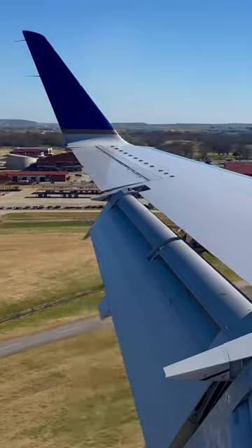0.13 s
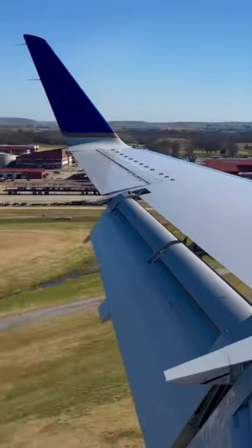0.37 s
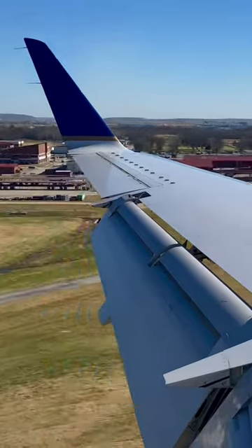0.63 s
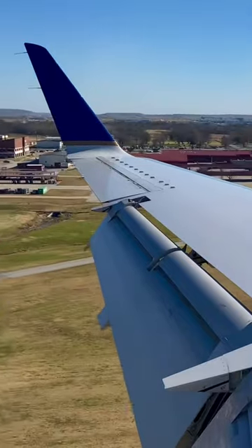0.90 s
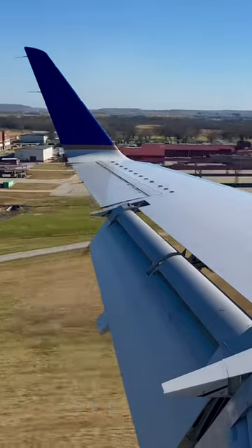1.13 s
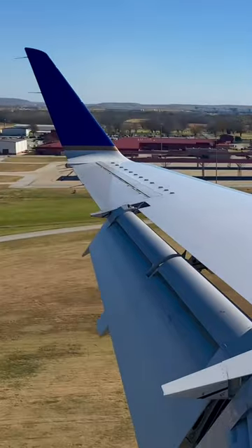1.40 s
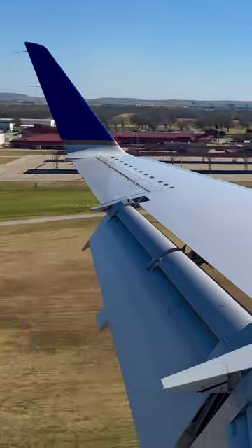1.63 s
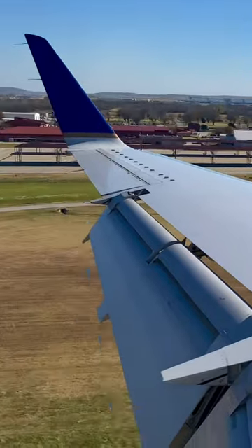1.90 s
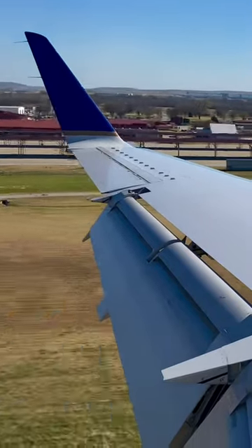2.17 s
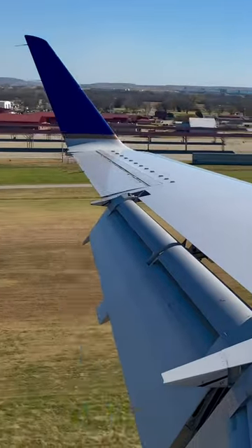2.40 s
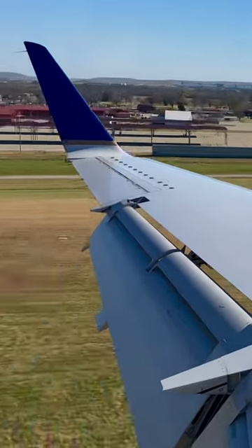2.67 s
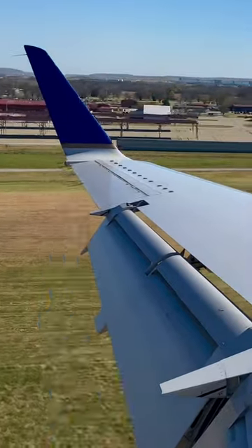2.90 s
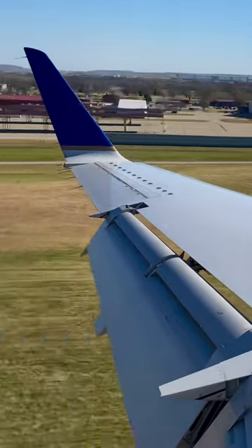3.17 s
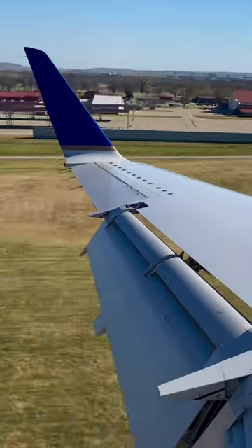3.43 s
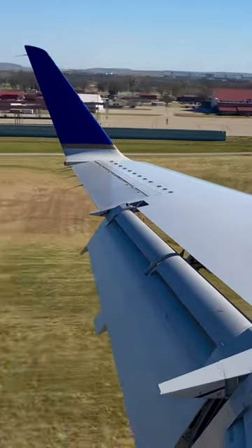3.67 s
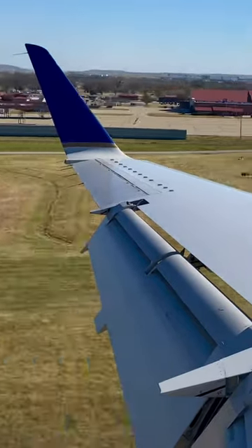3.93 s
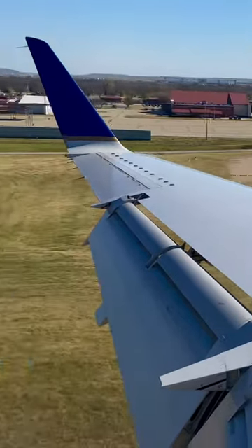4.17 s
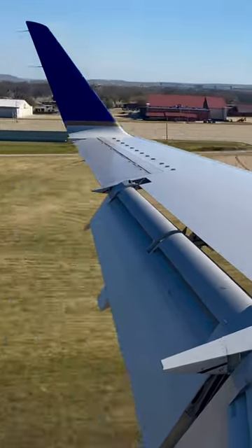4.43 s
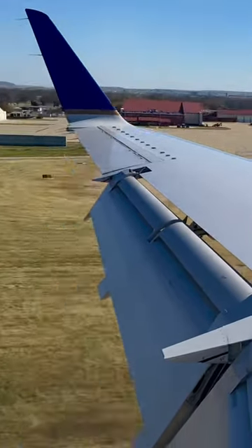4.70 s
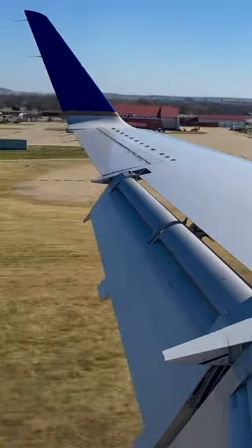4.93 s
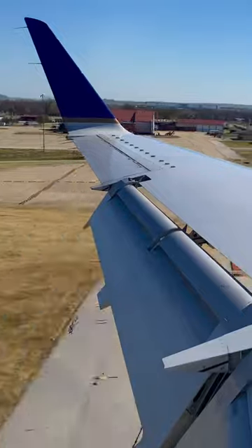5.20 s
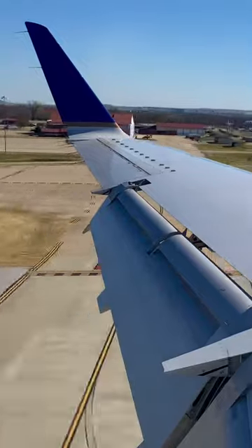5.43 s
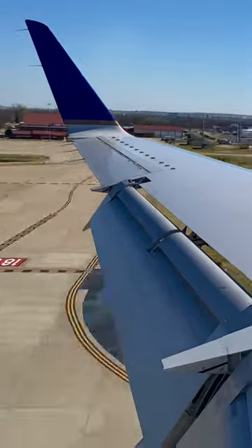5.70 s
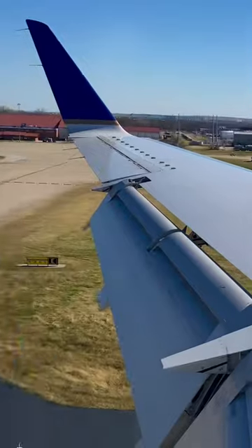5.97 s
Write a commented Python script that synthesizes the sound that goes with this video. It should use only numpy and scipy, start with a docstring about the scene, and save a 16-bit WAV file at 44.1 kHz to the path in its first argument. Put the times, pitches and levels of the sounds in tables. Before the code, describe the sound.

Inside a landing airliner, a dense low engine roar drones on, panels buffeted by air, faint unstable whistles flickering above it.

```python
"""A window seat over the wing of a twin-engine airliner on final approach, flaps down, heard by a two-port phone.
Jet rumble booms in the cabin's low modes and turbulent air drums on the wall panels: noise in resonances.
Gaps and ducts whistle like very narrow noise, wavering and breaking; a diffuse roar and vent hiss are shaped noise.
The two engine cores sing faint sine tones that sink as the throttles ease back.
Small rustles near the phone are short bursts of bright noise."""
import sys
import numpy as np
from scipy import signal
from scipy.fft import rfft, irfft, next_fast_len
from scipy.io import wavfile
from scipy.ndimage import uniform_filter1d, minimum_filter1d

SR = 44100
rng = np.random.default_rng(int(sys.argv[2]) if len(sys.argv) > 2 else 0)


def nominal_scale(level):
    """Amplitude ratio for a level in decibels (scalar or array-like)."""
    x = np.asarray(level, float) / 20
    return 10 ** x


def generate_wav(sig):
    """Save sig (samples, or channels by samples) to the path in sys.argv[1] as 16-bit PCM at SR."""
    pcm = np.round(np.clip(np.atleast_2d(sig).T, -1, 1) * 32767).astype(np.int16)
    wavfile.write(sys.argv[1], SR, pcm)


N = 268039
TIME = np.arange(N) / SR
SIZE = next_fast_len(N)
FREQ = np.arange(SIZE // 2 + 1) * SR / SIZE + 1e-3

# gear-mesh rate of the faster engine at the start and after the first throttle move
MESH_HZ, EASED_HZ = 767, 753.7
BLADE_ORDER = 7.852  # compressor blade tone as a multiple of the mesh rate
SIDE = np.array([[.5], [-.5]])  # splits a left-minus-right difference between the two ports


def hiss():
    """Spectrum of white noise with power 1 per Hz."""
    return rfft(rng.standard_normal(SIZE)) * np.sqrt(SR / 2)


def walk(rate):
    """Slow chance: noise smoothed twice over 1 / rate s, spread 1."""
    span = int(SR / rate)
    slow = uniform_filter1d(rng.standard_normal(N), span)
    slow = uniform_filter1d(slow, span)
    return slow / slow.std()


def ring(mode, steep):
    """Noise in one resonance, reaching the two ports with its own balance and phase."""
    hz, width, db, pan_db, lead = mode
    shape = (1 + ((FREQ - hz * hz / FREQ) / width) ** 2) ** (-steep / 2)
    shape = shape / np.sqrt(np.sum(shape ** 2) * SR / SIZE)  # rms 1 before the level is set
    ports = nominal_scale(db + SIDE * pan_db) * np.exp(1j * SIDE * lead)
    return irfft(hiss() * shape * ports, SIZE)[:, :N]


def drift(sound, share, rate):
    """Resonances wander: the sound is read slightly faster and slower by turns."""
    place = np.arange(N) + np.cumsum(share * walk(rate))
    return np.array([np.interp(place, np.arange(N), port) for port in sound])


def spool():
    """Mesh rate over time: after each throttle move the core sinks towards the new speed with a lag."""
    # throttle pulled back: (time [s], mesh rate aimed at [Hz])
    throttle_moves = [(1.95, EASED_HZ), (5.7, 745)]
    lag_s, speed_hunt = .55, .0003  # hunting is a share of the speed
    mesh_hz, before = np.full(N, float(MESH_HZ)), MESH_HZ
    for s, aim in throttle_moves:
        progress = 1 - np.exp(-np.maximum(TIME - s, 0) / lag_s)
        mesh_hz = mesh_hz + (aim - before) * progress
        before = aim
    return mesh_hz * (1 + speed_hunt * walk(2))


def boom():
    """Jet rumble in the long cabin's modes; each swells alone, all wander a little together."""
    # low cabin resonances:
    # (frequency [Hz], width [Hz], level [dB], left minus right [dB], left leads by [rad])
    cabin_modes = [(70.8, 37.3, -20, 1, 0.083), (86.8, 23, -21, 2, 0.044), (117, 16.6, -21, 2, 0.27),
                   (136.4, 27.6, -16, 2.5, 0.32), (158.2, 18, -23, 2.5, 0.35),
                   (199, 57.4, -23.5, 2.5, 0.071), (254, 78, -32, 0, 1.7), (318, 62, -35, 6, 1.37)]
    swell_db, swells_per_s = 0.65, 3.5
    buffet_db, buffets_per_s = 1.1, 18  # air buffeting the flaps shakes every mode at once
    rumble = sum(ring(mode, steep=1.86) * nominal_scale(swell_db * walk(swells_per_s)) for mode in cabin_modes)
    return nominal_scale(buffet_db * walk(buffets_per_s)) * drift(rumble, share=.02, rate=5)


def walls(high):
    """Turbulent air drums on the wall panels; each wavers alone, octaves gust and drift together."""
    # panel resonances:
    # (frequency [Hz], width [Hz], level [dB], left minus right [dB], left leads by [rad])
    panel_modes = [(423.5, 27, -33.5, 9.5, -2), (549.2, 24, -31, 5.5, 2.5), (595, 51, -29.5, 2.5, 3),
                   (628, 40, -29, 6.5, -3), (676.4, 59, -33, 0, 2), (814, 270, -41.5, 1, 3.0),
                   (753, 68, -38.5, 4.5, 3), (857, 24, -40.5, 0, 2.5), (840, 39, -43, -3, 3),
                   (975, 83, -39.5, -1, 2), (989, 59, -43.5, -3.5, 1.2), (1030, 130, -48, 2, 4.5),
                   (1179, 18, -48, 11.5, 2.5), (1391, 14, -51, 7.5, 4), (1536, 29, -55.5, 1, -3),
                   (1588, 21, -59.5, 6.5, 0), (2067, 83, -60, 0, 0), (2320, 100, -66.5, 5, 2),
                   (5070, 250, -67, 6.5, 1.5), (5760, 150, -70, 9, 2), (6140, 600, -65.5, 9.5, 1.8)]
    gust_db, gusts_per_s = 1.1, 5.8  # shared by neighbouring panels
    eddy_db, eddies_per_s = 1.6, 40  # quick eddies roughen the roar
    octaves = np.zeros((4, 2, N))  # from 400 Hz upwards
    for mode in panel_modes:
        # thrust drives the panels near 1 kHz most
        thrust_db = 2.7 * np.exp(-(np.log(mode[0] / 1000) / 0.34) ** 2) * (high - .4)
        panel = ring(mode, steep=1.78) * nominal_scale(thrust_db + 0.53 * walk(1.7))
        octaves[int(np.log2(mode[0] / 400))] += panel
    out = 0
    for octave in octaves:
        unrest_db = gust_db * walk(gusts_per_s) + eddy_db * walk(eddies_per_s)
        out = out + drift(octave, share=.011, rate=9) * nominal_scale(unrest_db)
    return out


def diffuse():
    """Roar from all sides, unrelated at the two ports below the vent hiss; octave bands flicker alone."""
    # spectrum of roar and vent hiss: (frequency [Hz], left level [dB per Hz], right level [dB per Hz])
    roar_spectrum = [(25, -63, -65.5), (60, -53, -53), (160, -52, -59), (258, -47, -51),
                     (385, -46.5, -50.5), (470, -53.5, -52.5), (600, -51, -60.5), (843, -65.5, -57),
                     (1090, -62, -75.5), (1250, -68.5, -72.5), (1980, -76.5, -78), (3260, -82.5, -85.5),
                     (5000, -84.5, -91), (7360, -89.5, -89.5), (9740, -99, -99), (10500, -102.5, -102.5),
                     (12100, -108.5, -108.5), (15000, -110, -110)]
    hz, *port_db = np.transpose(roar_spectrum)
    left, right = hiss(), hiss()
    # the top hiss comes from one vent and reaches the right port late: in and out of phase by turns
    vent = 0.9 * np.clip((FREQ - 7000) / 1500, 0, 1)
    late = np.exp(-2j * np.pi * (FREQ - 10950) / 4600)
    right = vent * late * left + np.sqrt(1 - vent ** 2) * right
    wash = np.array([noise * nominal_scale(np.interp(np.log(FREQ), np.log(hz), db))
                     for noise, db in zip((left, right), port_db)])
    octave = np.clip(np.log2(FREQ / 125), 0, 7)
    out = 0
    for k in range(8):
        crossfade = np.cos(np.pi / 2 * np.clip(octave - k, -1, 1)) ** 2
        band = irfft(wash * crossfade, SIZE)[:, :N]
        out = out + band * nominal_scale(0.5 * walk(34))
    return out


def surges(whistle_hz):
    """Level change of one whistle over time, dB: a rounded rise or dip at each of its surges and lulls."""
    # surges and lulls: (time [s], whistle frequency [Hz], change [dB], length [s])
    surge_list = [(0.06, 1728, 4.5, .1), (0.287, 1728, 1.5, 0.054), (0.408, 1728, 8, 0.042),
                  (0.663, 1728, 5, 0.073), (1.007, 1728, 6, 0.095), (1.606, 1728, 4, 0.073),
                  (1.82, 1728, 4, .1), (1.91, 1728, 11, 0.065), (2.164, 1728, 3, 0.051),
                  (2.51, 1728, 6, 0.033), (2.68, 1728, 5, 0.054), (2.864, 1728, 8, 0.15),
                  (2.975, 1728, -9, .05), (3.44, 1728, 3, 0.1), (3.792, 1728, 5, 0.1),
                  (4.454, 1728, 6.5, 0.067), (4.8, 1728, 8, 0.065), (5.54, 1728, 4.5, 0.048),
                  (6.063, 1728, 8, 0.071), (1.69, 2266, 7, .06), (2.62, 2266, 6, 0.12),
                  (2.88, 2266, 4, .05), (3.11, 2266, 7.5, 0.12), (3.987, 2266, 9, 0.1),
                  (3.35, 2266, 7, .05), (3.65, 2266, 3, .08), (4.2, 2266, 2, .25), (4.6, 2266, 2, 0.11),
                  (4.2, 2095, 8, 0.81), (5.198, 2095, 6, .5), (3.085, 1728, 3, .05),
                  (3.332, 1728, 4, 0.043), (4.94, 1728, 3, .08), (5.297, 2266, 5, 0.027),
                  (5.51, 2266, 3, .07), (5.94, 2266, 6, .08), (3.02, 1728, 4, .04), (3.2, 1728, 3, .06),
                  (3.52, 1728, 3, .07), (4.05, 1728, 3, .05), (4.3, 1728, 4, .05), (4.57, 1728, 3, .04),
                  (2.46, 1728, -7, .05), (5.29, 1728, -7, .06), (5.373, 1728, -6, .05),
                  (5.846, 1728, -5, .09), (0.272, 2266, 5, .08), (2.481, 2266, 5, .05),
                  (2.722, 2266, 5, .04), (4.416, 2266, 4, .04), (4.861, 2266, 5, .05),
                  (5.225, 2266, 4, .04), (3.236, 2266, -7, .09), (3.904, 2266, -9, .05),
                  (5.733, 2266, -8, .08)]
    return sum(db * np.exp(-(2 * (TIME - s) / length) ** 2) for s, hz, db, length in surge_list
               if abs(hz / whistle_hz - 1) < .04)


def waver(mode, flutter_db, halo_db, held_db, depth):
    """A wavering whistle, like very narrow noise: pitch wanders, short breaks interrupt, a halo surrounds it."""
    hz, width, db, pan_db, lead = mode
    phase = 2 * np.pi * np.cumsum(hz + 0.357 * width * walk(30.5)) / SR
    # a break falls where a random walk passes near zero; surges make it shallower
    break_depth = depth * nominal_scale(-3 * np.maximum(held_db, 0))
    breaks = 1 - break_depth * np.exp(-(walk(30) / .33) ** 2)
    core = np.sqrt(2) * nominal_scale(db + SIDE * pan_db + held_db) * breaks * np.sin(phase + SIDE * lead)
    halo = ring((hz, 2.6 * width, db + halo_db, pan_db, lead), steep=1.0)
    return nominal_scale(flutter_db) * (core + halo * nominal_scale(held_db / 3))


def whistles(high):
    """Air across gaps and ducts excites narrow resonances; the four clearest waver and break, the rest hiss on."""
    # narrow resonances, the four clearest first, levels before the offsets below:
    # (frequency [Hz], width [Hz], level [dB], left minus right [dB], left leads by [rad])
    whistle_modes = [(1728, 16, -47, 8, -1.4), (2266, 16, -56, -1, 1.1), (2941, 24, -57, 1, 1.0),
                     (2092, 14, -59.5, .5, -.5), (2676, 24, -66, 8, .2), (2810, 24, -60, -2, 1.6),
                     (3395, 26, -67, 3, .9), (3470, 14, -73, 5, 1.2), (10094, 40, -82, -1, .3),
                     (11865, 80, -82, 0, -.1), (12134, 80, -83, 0, 0.)]
    # offset of each of the four at the higher engine speed: (level [dB], ..)
    rest_db = (-1, -3, -1.5, -7)
    # how much louder each of the four is at the higher engine speed: (change [dB], ..)
    thrust_gain_db = (0, -1.5, 0.5, -2)
    flutters_db, flutters_per_s = (1.8, 1.3, 1.0, 1.5), 45
    halos_db, break_depths = (-5, -5, -6, -4), (.85, .9, .3, .6)
    out = 0
    for mode, rest, gain, flutter, halo_db, depth in zip(
            whistle_modes, rest_db, thrust_gain_db, flutters_db, halos_db, break_depths):
        flutter_db = rest + gain * (high - 1) + flutter * walk(flutters_per_s)
        out = out + waver(mode, flutter_db, halo_db, surges(mode[0]), depth)
    faint = sum(ring(mode, steep=2.0) for mode in whistle_modes[4:])
    return out + nominal_scale(2.0) * faint


def engine(mesh_hz, high, levels):
    """Shaft, gear and blade tones; standing waves change each tone's level at each port as the speed sinks."""
    # shaft, gear harmonics and a compressor blade row: (multiple of the mesh rate, ..)
    orders = (.3012, 2, 4, 6, 7, BLADE_ORDER, 8, 9)
    phase = 2 * np.pi * np.cumsum(mesh_hz) / SR
    out = 0
    for order, row in zip(orders, levels):
        # shaft and gear tones hold steadier; the blade tone is shaken by turbulence
        flicker_db, blur_rad = (3, .9) if order == BLADE_ORDER else (1.2, .4)
        fast_db, slow_db = np.reshape(row, (2, 2, 1))
        db = slow_db + high * (fast_db - slow_db) + flicker_db * walk(22.0)
        # long waves reach both ports nearly together, short ones at any phase
        start = 2 * np.pi * (rng.uniform() + min(order / 2, 1) * rng.uniform(size=(2, 1)))
        out = out + np.sqrt(2) * nominal_scale(db) * np.sin(order * phase + start + blur_rad * walk(60))
    return out


def engine_cores(mesh_hz, high):
    """Two cores turning at slightly different speeds, so that their tones beat."""
    # faster, then slower engine, one row an order:
    # (left at higher speed [dB], right at higher speed [dB], left at lower [dB], right at lower [dB])
    fast_engine_tones = [(-36, -28, -37.5, -26), (-61.5, -63, -59.5, -62.5), (-68, -64, -68, -70.5),
                         (-84, -90, -60.5, -69), (-70.5, -90.5, -65, -80.5), (-60.5, -78.5, -65, -70),
                         (-71, -62, -82.5, -85), (-67, -71, -79, -86)]
    slow_engine_tones = [(-38.5, -26, -39, -35), (-91.5, -90.5, -93, -86.5), (-78.5, -81, -80.5, -93.5),
                         (-84, -80, -64, -75), (-79.5, -82, -94.5, -77), (-73, -72, -71.5, -77.5),
                         (-67.5, -80, -73, -72.5), (-74.5, -79.5, -88.5, -89)]
    faster = engine(mesh_hz, high, fast_engine_tones)
    slower = engine(.9921 * mesh_hz, high, slow_engine_tones)
    return faster + slower


def rustles():
    """Short bursts of bright friction noise with a thinner top, nearer the left port."""
    # bursts near the phone: (time [s], peak level of the body at the left [dB], frequency [Hz], length [s])
    rustle_list = [(.038, -40.5, 3000, .014), (.083, -41, 3100, .014), (5.225, -54, 4500, .005)]
    out = np.zeros(N)
    for s, db, hz, length in rustle_list:
        body_band = signal.butter(1, (hz / 1.25, hz * 1.3), "band", fs=SR, output="sos")
        sheen_band = signal.butter(2, (hz * 1.7, hz * 2.4), "band", fs=SR, output="sos")
        body = signal.sosfilt(np.vstack([body_band, body_band]), rng.standard_normal(N))
        sheen = signal.sosfilt(sheen_band, rng.standard_normal(N))
        burst = body / body.std() + nominal_scale(-8) * sheen / sheen.std()
        swell = np.sin(np.pi * np.clip((TIME - s) / length, 0, 1))
        out = out + nominal_scale(db) * burst * swell
    return out * nominal_scale(np.array([[0], [-3]]))


def scene():
    """Everything heard at the seat."""
    mesh_hz = spool()
    # 1 at the higher engine speed, 0 at the eased speed and below
    high = np.clip((mesh_hz - EASED_HZ) / (MESH_HZ - EASED_HZ), 0, 1)
    air_fade_db_per_s = -0.22  # airflow weakens as the aircraft slows
    air = (walls(high) + diffuse()) * nominal_scale(air_fade_db_per_s * (TIME - TIME.mean()))
    return boom() + air + whistles(high) + engine_cores(mesh_hz, high) + rustles()


def band_limit(x):
    """A steep low-pass at the top of the band."""
    return signal.sosfilt(signal.butter(12, 16790, fs=SR, output="sos"), x)


def record(dry):
    """The phone limits the peaks, fades in after a short blank, fades out at the end and cuts the top."""
    hold = int(.012 * SR)
    peak = -minimum_filter1d(-np.abs(dry).max(axis=0), hold)
    gain = uniform_filter1d(np.minimum(1, (.84 / peak) ** .85), hold)
    fade_in = (TIME - .0364) / .0003  # blank [s], then rise [s]
    fade_out = (TIME[-1] - TIME) / .003
    fades = np.clip(np.minimum(fade_in, fade_out), 0, 1)
    top_cut = signal.ellip(8, .2, 60, 15050, fs=SR, output="sos")  # low-pass at 15050 Hz
    mix = signal.sosfilt(top_cut, dry * gain * fades)
    return band_limit(mix)


dry = scene()
out = record(dry)
generate_wav(out)
```